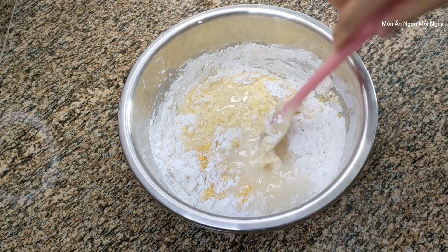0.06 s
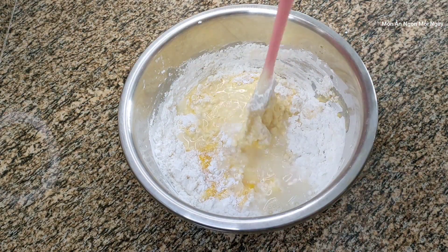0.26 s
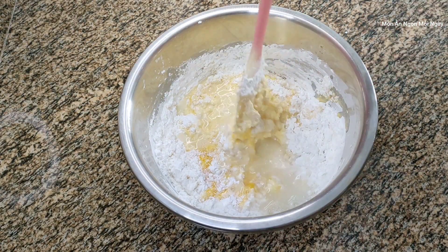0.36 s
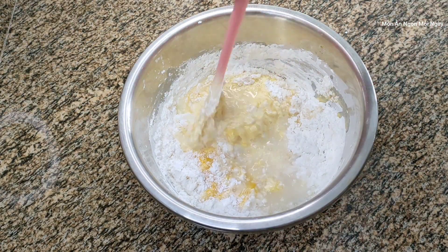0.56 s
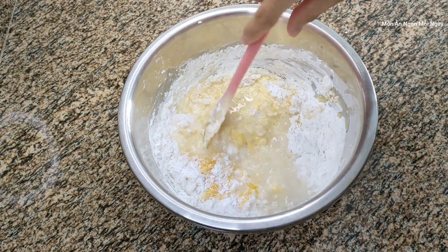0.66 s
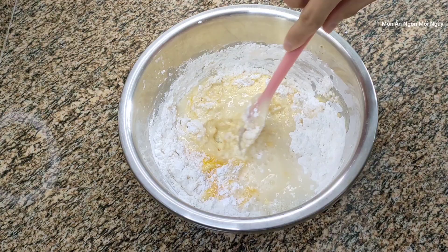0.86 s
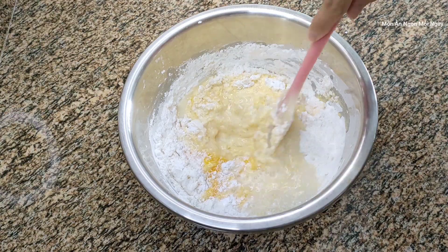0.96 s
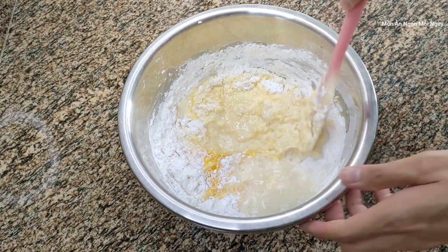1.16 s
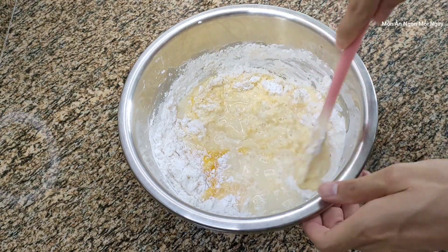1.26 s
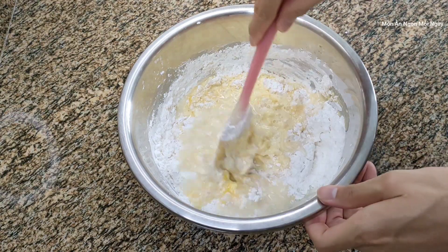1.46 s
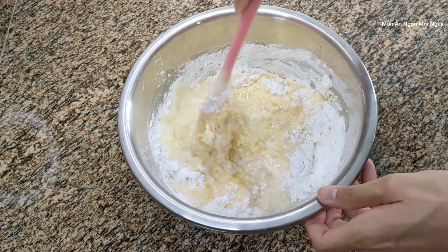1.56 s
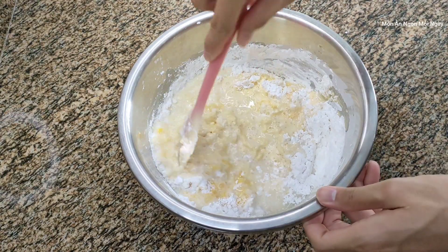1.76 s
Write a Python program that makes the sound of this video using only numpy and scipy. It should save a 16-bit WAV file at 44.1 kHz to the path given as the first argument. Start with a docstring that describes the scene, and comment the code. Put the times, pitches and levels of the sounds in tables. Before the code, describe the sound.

A spatula stirring wet batter knocks a steel bowl hollowly four times, then scrapes and squelches on.

```python
"""A steel bowl of wet flour batter knocks hollowly four times, and the kitchen rings on.
Each knock is a set of fading sine notes plus contact noise; a sharp snap of noise bursts follows.
The silicone spatula stirring it hisses as narrow-band noise, and the batter crackles in tiny noise grains.
Air pockets pop as short bands of noise, a hand pats the rim, and the room drones quietly."""
import sys
import numpy as np
from scipy import signal
from scipy.fft import rfft, irfft, next_fast_len
from scipy.io import wavfile
from scipy.ndimage import uniform_filter1d

SR = 44100
rng = np.random.default_rng(int(sys.argv[2]) if len(sys.argv) > 2 else 0)


def file_out(sig):
    """Save sig as 16-bit WAV at sys.argv[1]."""
    # one column per channel
    cols = np.atleast_2d(sig).T
    # limit, then scale
    lim = np.clip(cols, -1, 1)
    pcm = np.round(lim * 32767).astype(np.int16)
    wavfile.write(sys.argv[1], SR, pcm)


N = 79380  # length in samples, 1.8 s

# A t60 is the time a sound takes to fall by 60 dB. Colours give relative levels, and likeness
# says how much left and right have in common (1 is identical).

# kitchen drone: colour (frequency [Hz], level [dB]), then (frequency [Hz], left-right likeness)
DRONE_COLOUR = [(20, -6.5), (35, -2.5), (73, 1), (100, -8), (130, -8), (158, 4.5), (210, -12.5),
                (470, -12.5), (750, -16), (1700, -18), (2500, -26.5), (4000, -23.5), (6800, -29.5),
                (7600, -36.5), (15000, -64)]
DRONE_ALIKE = [(30, 1), (200, 0.69), (1000, 0.12), (4000, 0.067), (10000, 0.53)]
DRONE_DB = -50
# likeness of the noises near the bowl (frequency [Hz], left-right likeness)
NEAR_ALIKE = [(300, 0.8), (1500, 0.047), (4500, 0.073), (8000, 0.88), (15000, 0.77)]

# the room's echoes: fading (frequency [Hz], t60 [s])
ROOM_FADING = [(150, 0.39), (620, 1.07), (1100, 0.81), (3000, 0.17), (10000, 0.1)]
# their colour (frequency [Hz], level [dB])
ROOM_COLOUR = [(150, 3), (480, -7), (690, 6.5), (1050, -3), (1800, -3), (3000, -6.5), (10000, -5)]
# their likeness (frequency [Hz], left-right likeness)
ROOM_ALIKE = [(200, 0.85), (600, 0.52), (1100, 0), (5000, 0.65)]
KNOCK_ROOM_DB, SMALL_ROOM_DB = -7, -2.5  # echo level for the knocks and for the small sounds
ROOM_DELAY_S, ROOM_BUILD_S = 0.012, 0.011  # the echoes start late and thicken gradually
STEEL_T60, STEEL_DB = 0.13, -4  # the dense high ring of the bowl's wall

# wet batter over time, before the trims below (time [s], squelch level [dB], fizz level [dB])
WET_LEVELS = [(0, -54.5, -64), (.2, -59, -83), (.28, -57, -63), (.34, -47, -72.5), (.48, -55, -59),
              (.55, -47.5, -74.5), (.635, -46.5, -55.5), (.705, -55, -75), (.8, -50.5, -71),
              (.93, -52.5, -67.5), (1.04, -59, -72.5), (1.28, -59.5, -74), (1.36, -53.5, -78),
              (1.43, -45.5, -64), (1.51, -52, -68.5), (1.6, -49, -62.5), (1.7, -65, -71), (1.8, -70, -94)]
SQUELCH_TRIM_DB, FIZZ_TRIM_DB = -2, 3
SQUELCH_PER_S, FIZZ_PER_S, GRAIN_SPREAD_DB = 300, 900, 2
# colours of the two batter sounds (frequency [Hz], level [dB])
SQUELCH_COLOUR = [(150, -24), (500, 0), (1100, 5), (1900, 8.5), (3000, 6.5), (5500, 4), (8000, -12.5),
                  (15000, -44)]
FIZZ_COLOUR = [(1000, -18), (4000, -13), (6500, 7.5), (8000, -2), (11000, 0), (15000, -9)]

# blade on steel, before the trim below (time [s], level [dB])
SCRAPE_LEVELS = [(0, -50.5), (.07, -73), (.21, -73), (.26, -52), (.335, -58), (.49, -44), (.53, -55.5),
                 (.66, -43.5), (.705, -56), (.78, -54), (.95, -49.5), (1.12, -55.5), (1.21, -46.5),
                 (1.29, -48), (1.385, -54.5), (1.52, -45), (1.68, -49.5), (1.8, -48)]
# drifting centre of its hiss (time [s], frequency [Hz])
SCRAPE_CENTRES = [(.2, 3950), (.65, 3950), (.95, 4040), (1.16, 3870), (1.28, 4220), (1.45, 3820),
                  (1.55, 4100), (1.8, 3940)]
# broader hiss around it (frequency [Hz], level [dB])
SKIRT_COLOUR = [(300, -32), (2700, 0), (3600, -5.5), (6000, 3.5), (7200, -25), (15000, -28)]
SCRAPE_HALF_WIDTH_HZ, SKIRT_DB, SCRAPE_TRIM_DB, SCRAPE_ROUGH_DB = 590, -12, -0.5, 1

# air pockets popping in the batter, before the trims below (time [s], level [dB], pitch [Hz])
POPS = [(0.0782, -42, 6340), (0.313, -34.5, 3380), (0.632, -36, 2090), (0.664, -28, 3800),
        (0.6643, -36, 1770), (0.8301, -32, 2180), (.958, -48, 5240), (1.413, -41, 5560),
        (1.4255, -36, 5500), (1.533, -39, 2550), (1.484, -36, 1330), (1.567, -40.5, 7100),
        (1.575, -34, 2380), (1.626, -38.5, 2470), (1.639, -35.5, 2480), (1.6816, -37.5, 3960),
        (1.78, -41, 1490)]
# colour of the spray (frequency [Hz], level [dB])
SPIT_COLOUR = [(200, 0), (1000, 4.5), (6000, 2), (8000, -15), (15000, -11)]
POP_T60, POP_ATTACK_S, POP_SKIRT_DB, POP_TRIM_DB = 0.029, 0.00087, -21, -2
SPIT_TRIM_DB, SPIT_T60 = -11, 0.021

# fingers meeting the rim: colour (frequency [Hz], level [dB])
GRIP_COLOUR = [(100, -21), (330, -1.5), (3300, -11), (4800, -2), (7000, -11), (9000, -28), (15000, -38)]
# ring of the rim (frequency [Hz], level [dB], t60 [s])
RIM_NOTES = [(1160, -4, .15), (1373, -3, .2), (1790, -3, .16), (1992, -4, .18), (2476, -8, .26),
             (4592, 1, .1)]
GRIP_S, GRIP_DB, GRIP_RING_DB, GRIP_T60 = 1.2985, -37, -42.5, 0.11

# colour of the snap's cracks and grit (frequency [Hz], level [dB])
SNAP_COLOUR = [(50, -20), (220, 1.5), (1200, -3.5), (4000, 2.5), (5500, -0.5), (7700, -19), (8700, -14),
               (15000, -29.5)]
# colour of its thump (frequency [Hz], level [dB])
THUMP_COLOUR = [(90, -20.5), (280, 1), (900, -47.5)]
SNAP_S, SECOND_CRACK_S, SNAP_DB = 0.7232, 0.7254, -27.5
CRACK_DB, CRACK_T60 = 3.5, 0.0081  # this and the next two lines are relative to SNAP_DB
GRIT_PER_S, GRIT_T60, GRIT_TAIL_DB, GRIT_TAIL_T60 = 1500, 0.038, -5, 0.16
THUMP_DB, THUMP_T60 = -10.5, 0.17  # the mass of batter takes the snap's push

# knocks of the bowl (time [s], level [dB], contact brightness [Hz], upper note level [dB],
#                     clank note level [dB], click level [dB], free ringing [s], attack [s])
KNOCKS = [(0.2327, -17, 1150, -2.5, -10, -22.5, 0.017, 0.00068),
          (.2535, -17.5, 940, -1, -16, -29, 0.0099, .001),
          (0.3458, -5.5, 1080, 0, -4, -28.5, 0.017, 0.0028),
          (.4997, -7, 2570, -11, -2.5, -23.5, 0.0057, 0.0016)]
# notes of the loaded bowl while it rings freely (frequency [Hz], level [dB], t60 [s])
BOWL_NOTES = [(283.6, -15.5, 0.078), (476, -12, 0.088), (590.8, 3, 0.046), (700, -17, 0.11),
              (770, -17, 0.093), (1015, -10, .1), (1059.3, -3, 0.15), (1391, -9.5, 0.024),
              (1790, -8.5, 0.059), (2667, -19.5, 0.038), (3243, -8, 0.033), (5820, -8.5, 0.017)]
# colour of the blade's click on the steel (frequency [Hz], level [dB])
CLICK_COLOUR = [(1000, -26), (2600, -6), (3600, 8), (4500, -7), (6000, -7), (8000, -27)]
# standing notes of the kitchen that the knocks set ringing (frequency [Hz], level [dB], t60 [s])
STANDING_NOTES = [(610, -31, 1.1), (577, -28.5, .75)]
UPPER_HZ, CLANK_HZ = 950, 1250  # where the upper notes and the clank notes begin
DAMPED_T60, LOW_CUT_HZ = 0.057, 280  # extra fading once the bowl settles; it radiates little bass
THUD_DB, THUD_T60, CLICK_T60 = -13, 0.046, 0.031  # thud: contact noise of a knock
WALL_S, WALL_DB = 0.006736, -13.5  # echo from the wall behind the counter
KNOCK_PAN_DB, LAG_S = -4.5, 0.00033  # left against right: the right side is louder and earlier

TOP_HZ = 15800


def amp(db):
    """Decibels to gain."""
    return 10 ** (np.asarray(db) / 20)


def unit(x):
    """Scaled to rms 1."""
    return x / np.sqrt(np.mean(x ** 2) + 1e-20)


def along(points, hz):
    """Read a curve of (frequency, value) points, joined on a log frequency axis."""
    f, v = np.transpose(points)
    return np.interp(np.log(hz + 1), np.log(f + 1), v)


def curves(rows):
    """One value per sample for each column after the time."""
    s, *cols = np.transpose(rows)
    return [np.interp(np.arange(N) / SR, s, c) for c in cols]


def since(s):
    """Seconds since a moment, zero before it."""
    return np.maximum(np.arange(N) / SR - s, 0)


def fade(t, t60, attack=0.00018):
    """A quick rise and an exponential decay."""
    return np.exp(-np.log(1000) * t / t60) * (1 - np.exp(-t / attack))


def filtered(x, response):
    """Multiply the spectrum of x by a response that depends on frequency."""
    m = next_fast_len(N + SR // 2)  # spare room so that the end does not wrap round
    return irfft(rfft(x, m) * response(np.fft.rfftfreq(m, 1 / SR)), m)[..., :N]


def lowpass(ratio):
    """Two-pole response at frequency over corner frequency."""
    return 1 / (1 - ratio ** 2 + 1j * np.sqrt(2) * ratio)


def spread(pair, colour, alike):
    """Two unrelated signals coloured and blended into stereo of rms 1."""
    def blend(hz):
        angle = np.arccos(np.clip(along(alike, hz), -1, 1)) / 2
        return amp(along(colour, hz)) * [np.cos(angle), np.sin(angle)]

    mid, side = filtered(pair, blend)
    return unit(np.array([mid + side, mid - side]))


def noise(colour, alike=NEAR_ALIKE):
    """Coloured stereo noise of rms 1."""
    return spread(rng.standard_normal((2, N)), colour, alike)


def grains(per_s, colour, life_s):
    """Tiny noise bursts of random size at random moments, rms 1."""
    happens = rng.random(N) < per_s / SR
    sizes = amp(GRAIN_SPREAD_DB * np.minimum(rng.exponential(size=N), 4)) * happens
    # each burst's power dies away over life_s
    power = signal.lfilter([1], [1, -np.exp(-1 / (life_s * SR))], sizes ** 2)
    return spread(np.sqrt(power) * rng.standard_normal((2, N)), colour, NEAR_ALIKE)


def drone():
    """The quiet drone of the kitchen: steady noise, strongest in the bass."""
    return amp(DRONE_DB) * noise(DRONE_COLOUR, DRONE_ALIKE)


def kitchen(x):
    """The room's tail, much alike on both sides in the bass; each frequency dies at its own speed."""
    raw = noise([(20, 0.0055), (20000, 0.004)], ROOM_ALIKE)
    hz, t, z = signal.stft(raw, SR, nperseg=256)
    t60 = along(ROOM_FADING, hz)[:, None]
    # a longer tail gets less gain, so that its energy does not grow with its length
    gain = amp(along(ROOM_COLOUR, hz))[:, None] * np.sqrt(2 * np.log(1000) / (t60 * SR))
    tail = signal.istft(z * gain * fade(t, t60, ROOM_BUILD_S), SR, nperseg=256)[1][:, :SR]
    delayed = np.pad(tail, ((0, 0), (int(ROOM_DELAY_S * SR), 0)))
    return signal.fftconvolve(x, delayed, axes=1)[:, :N]


def steel(x):
    """Whatever sounds against the bowl's wall picks up its many close, short resonances."""
    t = np.arange(SR // 8) / SR
    ring = noise([(300, -16), (1500, 3.0), (16000, -2.0)])[:, :len(t)] * fade(t, STEEL_T60)
    ring = amp(STEEL_DB) * ring / np.linalg.norm(ring, axis=1, keepdims=True)
    ringing = signal.fftconvolve(x, ring, axes=1)[:, :N]
    return (x + ringing) / np.hypot(1, amp(STEEL_DB))


def batter():
    """Sticky films tear in a low squelch and a fine fizz."""
    squelch_db, fizz_db = curves(WET_LEVELS)
    squelch = grains(SQUELCH_PER_S, SQUELCH_COLOUR, life_s=0.00033)
    fizz = grains(FIZZ_PER_S, FIZZ_COLOUR, life_s=0.00076)
    return amp(squelch_db + SQUELCH_TRIM_DB) * squelch + amp(fizz_db + FIZZ_TRIM_DB) * fizz


def scrape():
    """The blade's friction hisses in one narrow, drifting resonance, with a broader hiss around it."""
    level_db, = curves(SCRAPE_LEVELS)
    hz, t, z = signal.stft(rng.standard_normal((2, N)), SR, nperseg=512)
    centre_hz = np.interp(t, *np.transpose(SCRAPE_CENTRES))
    detune = (hz[:, None] - centre_hz) / SCRAPE_HALF_WIDTH_HZ
    hiss = unit(signal.istft(z / np.sqrt(1 + detune ** 10), SR, nperseg=512)[1][:, :N])
    wander = unit(uniform_filter1d(rng.standard_normal(N), size=180))
    roughness = amp(SCRAPE_ROUGH_DB * wander)
    return amp(level_db + SCRAPE_TRIM_DB) * roughness * (hiss + amp(SKIRT_DB) * noise(SKIRT_COLOUR))


def pops():
    """Each air pocket gives a short, rough note and spits as it bursts."""
    notes, spray = np.zeros((2, N)), np.zeros(N)
    for s, db, hz in POPS:
        t = since(s)
        band = [(hz / 10, 2 * POP_SKIRT_DB), (hz / 1.6, POP_SKIRT_DB), (hz, 0),
                (hz * 1.43, POP_SKIRT_DB), (hz * 10, 3 * POP_SKIRT_DB)]
        notes += amp(db) * fade(t, POP_T60, POP_ATTACK_S) * noise(band)
        spray += amp(db) * fade(t, SPIT_T60, POP_ATTACK_S)
    return amp(POP_TRIM_DB) * notes + amp(SPIT_TRIM_DB) * spray * noise(SPIT_COLOUR)


def grip():
    """Fingers pat the rim, which rings faintly."""
    t = since(GRIP_S)
    ring = np.zeros((2, N))
    for hz, db, t60 in RIM_NOTES:
        start = rng.random((2, 1))  # each side starts elsewhere in the cycle
        ring += amp(db) * fade(t, t60) * np.sin(2 * np.pi * (hz * t + start))
    pat = fade(t, GRIP_T60) * noise(GRIP_COLOUR)
    return amp(GRIP_DB) * pat + amp(GRIP_RING_DB) * ring


def snap():
    """Two hard cracks in quick succession, a dull thump and a gritty tail as the spatula digs in again."""
    t = since(SNAP_S)
    both_cracks = fade(t, CRACK_T60) + fade(since(SECOND_CRACK_S), CRACK_T60)
    crack = amp(CRACK_DB) * both_cracks * noise(SNAP_COLOUR)
    grit_level = fade(t, GRIT_T60) + amp(GRIT_TAIL_DB) * fade(t, GRIT_TAIL_T60)
    grit = grit_level * grains(GRIT_PER_S, SNAP_COLOUR, life_s=0.00016)
    thump = amp(THUMP_DB) * fade(t, THUMP_T60) * noise(THUMP_COLOUR)
    return amp(SNAP_DB) * (crack + grit + thump)


def bowl_ring(s, upper_db, clank_db, free_s, attack_s):
    """The struck bowl rings in its own notes, then settles and is damped faster."""
    t = since(s)
    ring = np.zeros(N)
    for hz, level, t60 in BOWL_NOTES:
        strike_db = clank_db if hz > CLANK_HZ else upper_db if hz > UPPER_HZ else 0
        ring += amp(level + strike_db) * fade(t, t60, attack_s) * np.sin(2 * np.pi * hz * t)
    return ring * np.exp(-np.log(1000) * since(s + free_s) / DAMPED_T60)


def wall_echo(blow):
    """The wall sends a blow back a moment later, quieter and duller."""
    return amp(WALL_DB) * filtered(
        blow, lambda hz: np.exp(-2j * np.pi * hz * WALL_S) / (1 + (hz / 2500) ** 2))


def knocks():
    """Each blow rings the bowl, a harder contact clanks; the wall echoes it and the kitchen holds on."""
    out = np.zeros((2, N))
    left_right = np.array([[0.5], [-0.5]])
    for s, db, bright_hz, upper_db, clank_db, click_db, free_s, attack_s in KNOCKS:
        t = since(s)

        def contact(hz):  # dulls the treble above bright_hz and cuts the bass
            return lowpass(hz / bright_hz) * lowpass(hz / LOW_CUT_HZ) * (hz / LOW_CUT_HZ) ** 2

        ring = bowl_ring(s, upper_db, clank_db, free_s, attack_s)
        thud_noise = noise([(200, 5.5), (5800, 0.5), (7500, -21), (15000, -41)])
        thud = amp(THUD_DB) * fade(t, THUD_T60) * thud_noise
        click = amp(db + click_db) * fade(t, CLICK_T60) * noise(CLICK_COLOUR)
        blow = filtered(amp(db) * (ring + thud), contact) + click
        blow = blow + wall_echo(blow)
        near = filtered(blow, lambda hz: np.exp(-2j * np.pi * hz * LAG_S * left_right))
        held = sum(amp(db + level) * fade(t, t60, ROOM_BUILD_S) * np.sin(2 * np.pi * hz * t)
                   for hz, level, t60 in STANDING_NOTES)
        out += near * amp(KNOCK_PAN_DB * left_right) + amp(KNOCK_ROOM_DB) * kitchen(blow) + held
    return out


def scene():
    """The kitchen drone, the stirring, the small sounds with their room echoes, and the knocks."""
    stirring = steel(scrape() + batter())
    small = steel(snap() + grip()) + pops()
    small_echoes = amp(SMALL_ROOM_DB) * kitchen(small)
    return drone() + stirring + small + small_echoes + knocks()


def record(dry):
    """Everything from TOP_HZ upwards is cut off sharply."""
    return filtered(dry, lambda hz: hz < TOP_HZ)


dry = scene()
out = record(dry)
file_out(out)
```